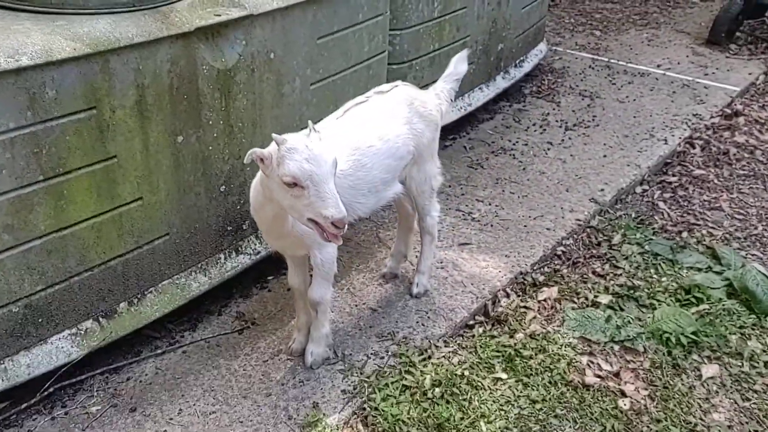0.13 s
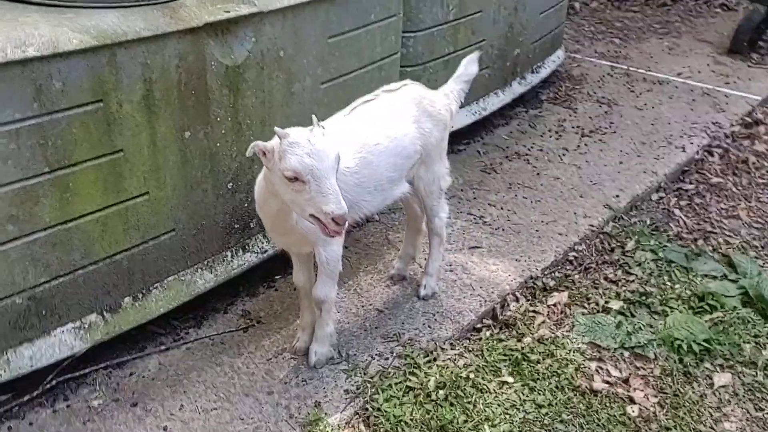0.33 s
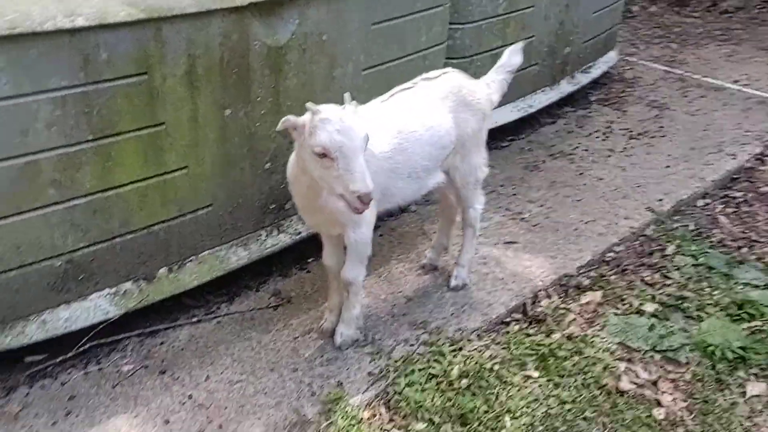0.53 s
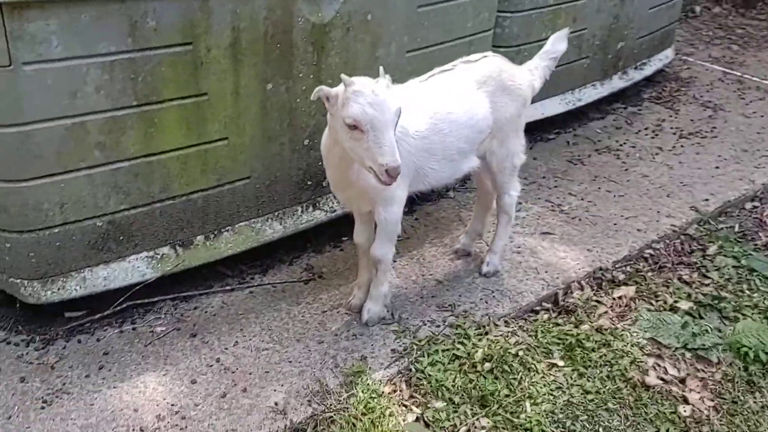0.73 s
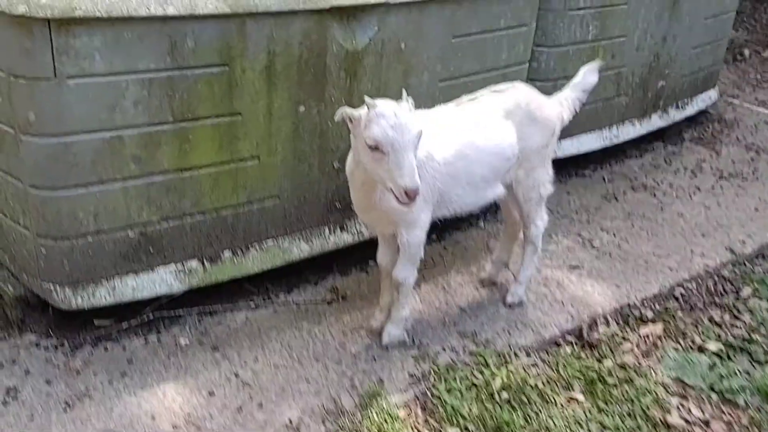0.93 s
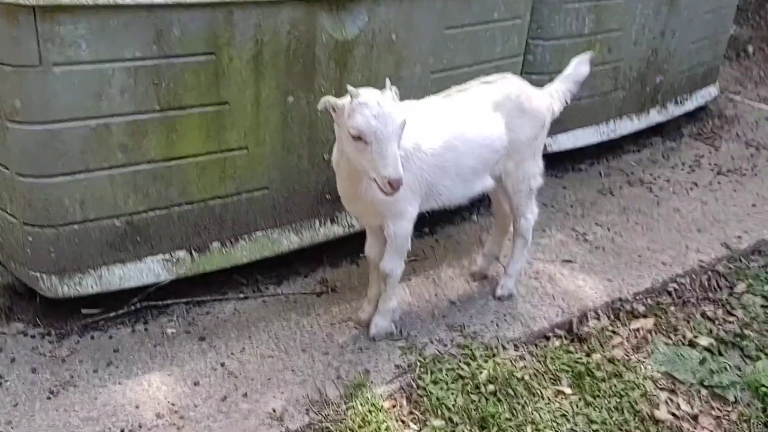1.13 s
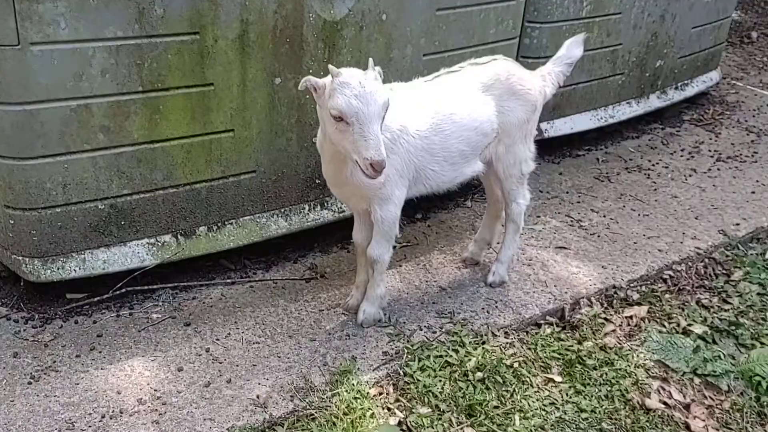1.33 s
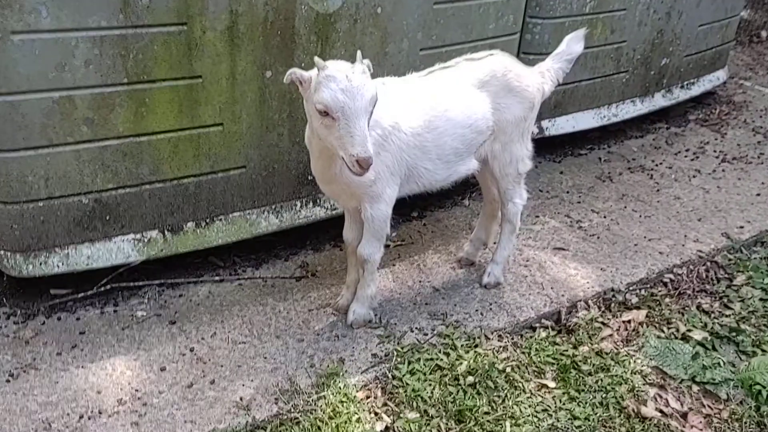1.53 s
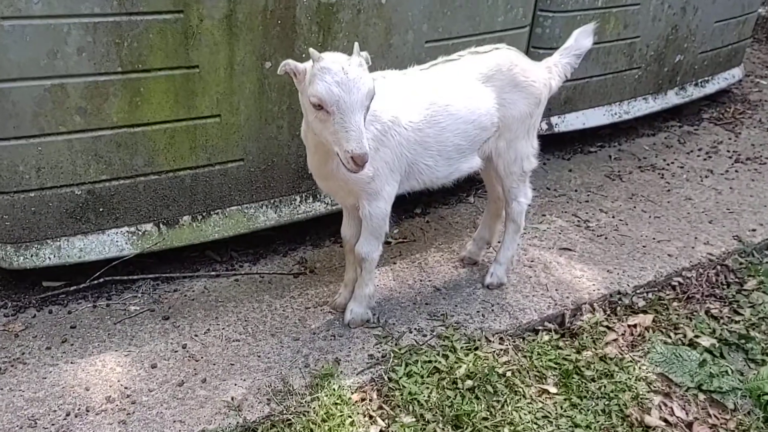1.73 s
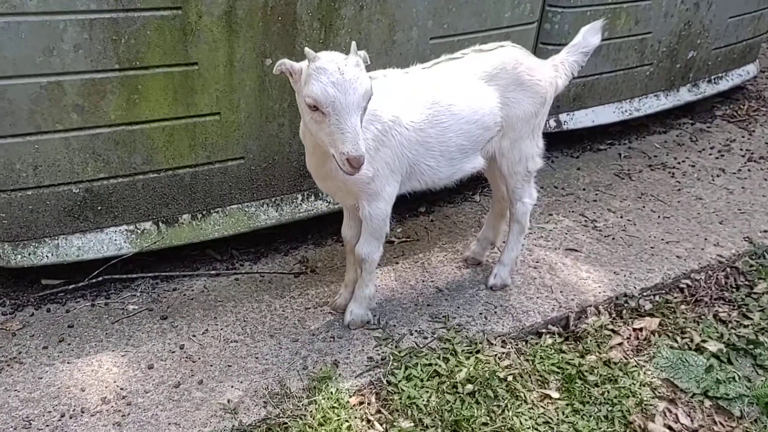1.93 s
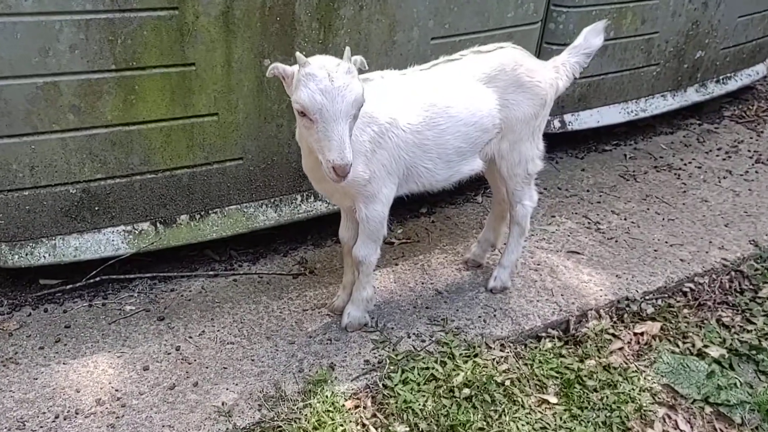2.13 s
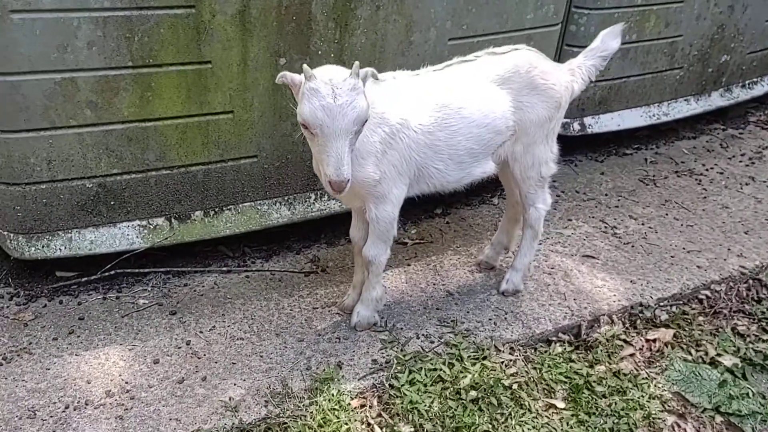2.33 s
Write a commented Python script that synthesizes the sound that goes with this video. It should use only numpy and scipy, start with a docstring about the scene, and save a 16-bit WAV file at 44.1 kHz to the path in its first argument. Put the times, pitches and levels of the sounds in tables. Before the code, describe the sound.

A young goat gives one high, trembling bleat outdoors, then a finger thumps the microphone.

```python
"""A goat kid gives one high, wavering bleat that sags and turns hoarse as its mouth closes: summed overtones
and pulsed breath, shaped by moving mouth resonances and answered by a near wall and the yard.
From within the bleat on, a finger bumps and brushes the right microphone port: ringing thuds and shaped noise.
After the bleat two distant songbirds whistle gliding sine tones among the trees, while a rustle dies away.
Grip rumble and a quiet outdoor hiss of coloured noise lie under it all."""
import sys
import numpy as np
from scipy import signal
from scipy.fft import rfft, irfft, next_fast_len
from scipy.io import wavfile
from scipy.ndimage import map_coordinates

SR = 44100
rng = np.random.default_rng(int(sys.argv[2]) if len(sys.argv) > 2 else 0)


def put_to_file(sound):
    """Save the sound as 16-bit audio at rate SR, in the file named by the first command-line argument."""
    columns = np.atleast_2d(sound).T  # one column per channel
    safe = np.clip(columns, -1, 1)
    whole_steps = np.round(safe * 32767)
    wavfile.write(sys.argv[1], SR, whole_steps.astype(np.int16))


N = 109853  # length in samples


def amp(db):
    """Decibels to gain."""
    return 10 ** (np.asarray(db) / 20)


def unit(x):
    """Scaled to rms 1."""
    return x / np.sqrt(np.mean(x ** 2) + 1e-20)


def along(points, hz):
    """(Hz, value) points read on a log frequency axis."""
    f, v = np.transpose(points)
    return np.interp(np.log(hz + 1), np.log(f + 1), v)


def curves(rows, t):
    """Each column after the first, read at the times t."""
    start, *columns = np.transpose(rows)
    return [np.interp(t, start, column) for column in columns]


def wobble(rate, t):
    """A smooth random curve, rate knots a second."""
    knots = rng.standard_normal(int(t[-1] * rate) + 4)
    return map_coordinates(knots, [t * rate])


def filtered(x, response):
    """x shaped by a gain that depends on frequency."""
    size = next_fast_len(N + SR // 2)
    return irfft(rfft(x, size) * response(np.fft.rfftfreq(size, 1 / SR)), size)[..., :N]


def noise(spectrum):
    """Coloured noise of rms 1."""
    return unit(filtered(rng.standard_normal(N), lambda hz: amp(along(spectrum, hz))))


def panned(x, balance):
    """Left and right leaning apart by frequency."""
    return filtered(x, lambda hz: amp(np.outer([.5, -.5], along(balance, hz))))


def resonance(spectrum, hz, size=4096):
    """Complex log gain of a causal (minimum-phase) resonator, read at hz."""
    grid = np.fft.rfftfreq(size, 1 / SR)
    cepstrum = irfft(np.log(amp(along(spectrum, grid))))
    # fold the cepstrum so that the phase follows from the gain
    cepstrum[1:size // 2] *= 2
    cepstrum[size // 2 + 1:] = 0
    return np.interp(hz, grid, rfft(cepstrum))


def echoes(x, decay):
    """A diffuse stereo tail in which each frequency dies at its own speed."""
    hz, t, z = signal.stft(rng.standard_normal((2, SR + SR // 2)), SR, nperseg=256)
    fade = amp(-60 * t / along(decay, hz)[:, None]) * (t > 0)
    tail = signal.istft(z * fade, SR, nperseg=256)[1]
    return signal.fftconvolve(np.atleast_2d(x), tail / np.linalg.norm(tail[0]), axes=1)[:, :N]


# one cycle of the tremble, a quick letting go and a slow build-up: cycle_share, effort (-1..1)
TREMBLE_CYCLE = [(0, 1), (.2, -0.92), (.7, 0.4), (1, 0.85)]
# how much of the tremble is left: start_s, depth_share
TREMBLE_DEPTH = [(.2, 1), (.25, 0.1)]
TREMBLE_PER_S, TREMBLE_START_S = 10.65, 0.0019


def tremble(t):
    """The throat's effort lets go quickly and builds up slowly, over and over."""
    cycle = (t - TREMBLE_START_S) * TREMBLE_PER_S % 1
    return curves(TREMBLE_CYCLE, cycle)[0] * curves(TREMBLE_DEPTH, t)[0]


# closing of the mouth: start_s, closing (0 open, 1 half, 2 shut)
MOUTH_CLOSING = [(.25, 0.2), (.268, 1.2), (.336, 1), (.352, 1.6)]


def mouth_shares(t):
    """The closing mouth crossfades between neighbouring shapes: open, half closed, nearly shut."""
    closing, = curves(MOUTH_CLOSING, t)
    return [np.clip(1 - abs(closing - i), 0, 1) for i in range(3)]


# resonances of throat and mouth, wide open, half closed and nearly shut: frequency_hz, gain_db
MOUTHS = [[(440, -27.5), (870, -12.5), (1310, 2.5), (1750, -15), (2180, -24.5), (2620, -1), (3500, -12.5),
           (3930, -12), (4370, -1.5), (5240, -12), (5680, -23), (6120, -17), (7860, -30.5), (10050, -39),
           (14420, -62.5)], [(410, -21.5), (820, -9.5), (1230, 2.5), (1640, -10), (2050, -9),
                               (2460, -12.5), (2870, -5.5), (3300, -11), (4100, -2.5), (4930, -4),
                               (6160, -20), (9850, -36), (14370, -58)], [(400, -14.5), (680, -28), (1200, -10), (1600, -18),
                                                   (2000, -3), (2400, -12), (2800, 0.5), (3300, -5),
                                                   (4000, -1.5), (4790, -2.5), (6390, -16), (9990, -37),
                                                   (14380, -56)]]
# pursing lips pull the low resonances down: start_s, shift_share (at 1600 Hz)
LIP_PURSING = [(.376, 0.014), (.405, 0.44)]
PHASE_SCATTER = .5  # radians, between the overtones
GRAIN_DB = 4  # random flicker of the top overtones
RASP_HZ, RASP_DB = 5500, 3.5  # overtones above this flare whenever the effort lets go


def mouth_gain(hz, t, effort):
    """Complex gain the mouth gives each overtone, grainy and raspy at the top."""
    purse = curves(LIP_PURSING, t)[0] * np.exp(-2 * np.log(hz / 1600) ** 2)
    # reading the response higher up moves its peaks down
    pursed_hz = hz * (1 + purse)
    log_gain = sum(w * resonance(m, pursed_hz) for w, m in zip(mouth_shares(t), MOUTHS))
    scatter = PHASE_SCATTER * rng.standard_normal((len(hz), 1))
    top_db = (GRAIN_DB * wobble(200, t) - RASP_DB * effort) * (hz > RASP_HZ)
    return np.exp(log_gain + 1j * scatter) * amp(top_db)


# tilt of the breath over the mouth's own colour: frequency_hz, gain_db
BREATH_TILT = [(2500, -13.5), (4500, -5.5), (7000, 10.5)]


def breath_noise(t, phase):
    """Turbulent air through the moving mouth, pulsed once per cycle of the voice."""
    hiss = [unit(filtered(noise(m), lambda f: amp(along(BREATH_TILT, f))))[:len(t)] for m in MOUTHS]
    moving = sum(w * h for w, h in zip(mouth_shares(t), hiss))
    return moving * (1 + .6 * np.cos(phase))


def levelled(gain, db):
    """Overtone gains scaled to a common rms level at each moment."""
    return gain * amp(db) / np.sqrt(np.sum(abs(gain) ** 2, axis=0) / 2)


# the bleat around which the tremble swings: start_s, pitch_hz, low_db (below TREBLE_HZ), treble_db
BLEAT = [(0, 438.7, -17.5, -16), (.19, 435.5, -18.5, -15.5), (.225, 431.5, -21, -20),
         (.25, 428.8, -18.5, -23), (.266, 411.5, -21, -22.5), (.294, 405.4, -24.5, -18),
         (.308, 416.3, -28, -23.5), (.336, 413.6, -29, -25.5), (.353, 403, -34.5, -21.5),
         (.378, 396.5, -36.5, -23.5), (.406, 353.6, -33.5, -33), (.428, 324.4, -45, -47.5)]
# hoarseness: start_s, jitter_share (of pitch), breath_db (against the voice)
HOARSENESS = [(.09, .003, -42), (.11, .006, -29), (.13, .003, -42), (.19, .003, -40), (.21, .006, -26),
              (.258, .012, -21), (.275, .003, -33), (.385, .004, -27), (.408, .02, -18), (.43, .08, -5)]
# stereo lean of the kid: frequency_hz, left_minus_right_db
GOAT_PAN = [(900, 2.5), (1300, -4), (2000, 7.5), (3000, -2.5), (5500, 0), (6500, 7.5), (9000, 3.5),
            (13000, 4)]
TREMBLE_PITCH, TREMBLE_LOW_DB, TREMBLE_HIGH_DB = 0.017, 2.5, 2.5  # swing of pitch (share) and levels
TREBLE_HZ, RELEASE_S = 2160, 0.016
FLUTTER_DB = 1.5  # at TREBLE_HZ, stronger above
LEFT_LEAD_S = .00007  # the voice reaches the left port first


def goat(count=36):
    """Trembling overtones and pulsed breath pass through a mouth that closes and purses."""
    end = BLEAT[-1][0]
    t = np.arange(int((end + 2 * RELEASE_S) * SR)) / SR
    effort = tremble(t)
    pitch, low_db, treble_db = curves(BLEAT, t)
    pitch = pitch * (1 + TREMBLE_PITCH * effort)
    low_db = low_db + TREMBLE_LOW_DB * effort
    treble_db = treble_db + TREMBLE_HIGH_DB * effort
    jitter, breath_db = curves(HOARSENESS, t)

    k = np.arange(1, count + 1)[:, None]
    hz = k * pitch
    phase = 2 * np.pi * np.cumsum(pitch * (1 + jitter * wobble(500, t))) / SR
    gain = mouth_gain(hz, t, effort)
    high = 1 / (1 + (TREBLE_HZ / hz) ** 20)  # steep crossover from low to treble
    ports = []
    for lead in (LEFT_LEAD_S, 0):
        # the real part moves the level, the imaginary part the phase
        flutter = np.array([wobble(30.33, t) + 1j * wobble(29.44, t) for _ in k])
        fluttered = gain * amp(FLUTTER_DB * np.sqrt(hz / TREBLE_HZ) * flutter)
        overtones = levelled(fluttered * (1 - high), low_db) + levelled(fluttered * high, treble_db)
        voice = np.sum(overtones * np.exp(1j * (k * phase + 2 * np.pi * hz * lead)), axis=0).real
        breath = breath_noise(t, phase) * np.hypot(amp(low_db), amp(treble_db))
        ports.append((voice + amp(breath_db) * breath) / np.hypot(1, amp(breath_db)))
    release = np.clip(1 - (t - end) / RELEASE_S, 0, 1)
    return panned(np.array(ports) * release, GOAT_PAN)


# colour of the snag and the scrapes: frequency_hz, gain_db
SCRAPE_TONE = [(300, -6), (1500, -2.5), (3200, -6), (5500, -12), (8000, -20), (16000, -40)]
SNAG_AT_S, SNAG_DB, SNAG_WIDTH_S = .5349, -17.5, 0.0009
SQUEAK_HZ, SQUEAK_RISE_S, SQUEAK_DB = 2310, .0012, -11  # pitch at the snag, e times higher per rise


def snag(t):
    """The fingertip snags the port with a crack of noise and slips with a tiny rising squeak."""
    crack = amp(SNAG_DB) * noise(SCRAPE_TONE) * np.exp(-((t - SNAG_AT_S) / SNAG_WIDTH_S) ** 2 / 2)
    slip = np.clip((t - SNAG_AT_S) / SQUEAK_RISE_S, -10, 2)
    squeak = np.sin(2 * np.pi * SQUEAK_HZ * SQUEAK_RISE_S * np.exp(slip))
    return crack + amp(SQUEAK_DB) * squeak * np.exp(-2 * slip ** 2) * (slip < 2)


# finger bumps: start_s, thud_db, thud_hz, thud_t60_s, scrape_db
FINGER_BUMPS = [(0.133, -27, 200, 0.012, -74), (0.4761, -9, 228, 0.016, -39.5),
                (0.535, -1.5, 178.6, 0.018, -17.5), (0.863, -51, 252, 0.016, -38)]
CASE_HZ, CASE_DB, CASE_T60_S = 101, -21, 0.047  # low ring of the camera body, against the thud
PORT_HZ, PORT_DB = 351, -4  # ring of the covered port, against the thud
THUD_ATTACK_S, SCRAPE_T60_S = .001, .022


def bumps(t):
    """Each bump is a dull thud with the rings of port and case, and a short scrape."""
    hits = np.zeros(N)
    for start, thud_db, hz, t60, scrape_db in FINGER_BUMPS:
        u = np.maximum(t - start, 0)
        attack = 1 - np.exp(-(u / THUD_ATTACK_S) ** 2)
        fade = lambda life: np.exp(-np.log(1000) * u / life) * attack
        thud = np.sin(2 * np.pi * hz * u) + amp(PORT_DB) * np.sin(2 * np.pi * PORT_HZ * u)
        case = amp(CASE_DB) * np.sin(2 * np.pi * CASE_HZ * u)
        hits += amp(thud_db) * (thud * fade(t60) + case * fade(CASE_T60_S))
        hits += amp(scrape_db) * noise(SCRAPE_TONE) * fade(SCRAPE_T60_S)
    return hits


# the sliding finger: start_s, level_db
BRUSH = [(.78, -67), (.84, -56), (.865, -42.5), (.93, -40.5), (.97, -55.5), (1.05, -75)]
# its colour: frequency_hz, gain_db
BRUSH_TONE = [(30, -26), (90, -0.5), (206, -1.5), (650, -13.5), (1190, -9), (2200, -23.5), (12000, -52.5)]
# handling rumble: start_s, level_db
GRIP = [(0, -66), (.2, -58), (.38, -53), (.55, -56.5), (.7, -68), (1.1, -64.5), (1.3, -72.5)]
# its colour: frequency_hz, gain_db
GRIP_TONE = [(25, -28.5), (60, -7), (110, -1.5), (500, -14), (4000, -69.5)]
LOW_CUT_HZ = 85  # for bumps and snag only
LEAK_DB = -25  # of the finger's noise into the left port


def finger():
    """Dull bumps, one squeaky snag and a short slide on the right port, over the rumble of the grip."""
    t = np.arange(N) / SR
    low_cut = signal.butter(4, LOW_CUT_HZ, "high", fs=SR, output="sos")
    port = signal.sosfilt(low_cut, snag(t) + bumps(t))
    for levels, tone in ((BRUSH, BRUSH_TONE), (GRIP, GRIP_TONE)):
        level_db = curves(levels, t)[0] + 1.2 * wobble(60, t)
        port += amp(level_db) * noise(tone)
    return np.array([amp(LEAK_DB) * port, port])


# arched whistles of the first bird: top_s, level_db
ARCHES = [(.648, -56), (1.008, -57), (1.348, -60.5), (1.668, -61)]
# shape of one arch: from_top_s, pitch_hz, level_db
ARCH_SHAPE = [(-.09, 1628, -18.5), (-.075, 1720, -2), (-.02, 2233, -2.5), (0, 2811, -4.5),
              (.016, 2200, -1.5), (.05, 1950, -6), (.105, 1602, -9.5), (0.149, 1533, -11)]
# rising chirps of the second bird: start_s, level_db
CHIRPS = [(.87, -63), (1.11, -63), (1.36, -63.5), (1.605, -65), (1.86, -65.5), (2.105, -65.5),
          (2.36, -67.5)]
# shape of one chirp, a quick rise, a gap, a soft low slur: from_start_s, pitch_hz, level_db
CHIRP_SHAPE = [(0, 2450, -2), (.02, 2800, 2), (.04, 3500, -2.5), (.075, 3580, -5.5), (.085, 2986, -50),
               (.097, 2080, -32), (0.111, 2014, -5), (.15, 1780, -21)]
# echo among the trees: frequency_hz, t60_s
TREES = [(3000, 0.35), (9000, 0.133)]
ARCH_WET_DB, CHIRP_WET_DB = -3, 5  # echo against the direct whistle
PITCH_DRIFT, PITCH_SHIVER = .012, 0.0041  # slow and fast, shares of the pitch
WHISTLE_FLICKER_DB = 2.5


def bird(calls, shape, wet_db):
    """One whistled figure, a gliding sine, repeated with an echo among the trees."""
    t = np.arange(N) / SR
    song = np.zeros(N)
    for start, call_db in calls:
        u = t - start
        hz, shape_db = curves(shape, u)
        waver = 1 + PITCH_DRIFT * wobble(8.8, t) + PITCH_SHIVER * wobble(120, t)
        phase = 2 * np.pi * np.cumsum(hz * waver) / SR
        level_db = call_db + shape_db + WHISTLE_FLICKER_DB * wobble(60, t)
        sounding = (u > shape[0][0]) & (u < shape[-1][0])
        song += amp(level_db) * np.sin(phase) * sounding
    return (song + amp(wet_db) * echoes(song, TREES)) / np.hypot(1, amp(wet_db))


# the near wall's answer: frequency_hz, t60_s
NEAR_WALLS = [(2000, 0.36), (12000, 0.32)]
# the far yard's answer: frequency_hz, t60_s
FAR_YARD = [(200, 1.1), (5000, 2)]
# colour of the far answer: frequency_hz, gain_db
FAR_TONE = [(400, 8), (1300, -3.5), (2000, 3.5), (5000, -0.5)]
NEAR_DB, FAR_DB = -22, -35  # against the kid, the far one before its colour


def yard(kid):
    """The bleat comes back as a short tail from a near wall and a longer one from the yard."""
    far = filtered(echoes(kid, FAR_YARD), lambda hz: amp(along(FAR_TONE, hz)))
    return amp(NEAR_DB) * echoes(kid, NEAR_WALLS) + amp(FAR_DB) * far


# soft rustle: start_s, level_db
RUSTLE = [(.6, -63.5), (1.1, -66), (1.6, -79)]
# its colour: frequency_hz, gain_db
RUSTLE_TONE = [(100, -9), (400, -4), (1500, -0.5), (5000, -9), (12000, -27.5)]


def rustle():
    """Soft noise, independent in both ports, that dies away after the bleat."""
    level_db, = curves(RUSTLE, np.arange(N) / SR)
    return amp(level_db) * np.array([noise(RUSTLE_TONE), noise(RUSTLE_TONE)])


# colour of the background hiss: frequency_hz, gain_db
AIR_TONE = [(15, -56.5), (25, -26.5), (79, -8), (113, 1.5), (173, -9), (233, -1), (289, -24.5), (421, -9),
            (495, -19), (826, -15.5), (1240, -21), (2230, -18), (3500, -16.5), (4200, -8), (4950, -7.5),
            (6380, -22), (9550, -9.5), (11200, -27.5), (15500, -31)]
# its stereo lean: frequency_hz, left_minus_right_db
AIR_PAN = [(60, -7.5), (250, 5.5), (6500, 5), (9500, -2.5), (13000, 3.5)]
AIR_DB, AIR_ALIKE = -64, 0.066  # level; share of power common to both ports


def air():
    """Faint steady outdoor hiss, partly alike in both ports."""
    common = np.sqrt(AIR_ALIKE) * noise(AIR_TONE)
    separate = np.sqrt(1 - AIR_ALIKE) * np.array([noise(AIR_TONE), noise(AIR_TONE)])
    return amp(AIR_DB) * panned(common + separate, AIR_PAN)


def scene():
    """The kid near a wall, the hand on the camera, the birds, and the yard behind."""
    kid = goat()
    birds = bird(ARCHES, ARCH_SHAPE, ARCH_WET_DB) + bird(CHIRPS, CHIRP_SHAPE, CHIRP_WET_DB)
    return kid + finger() + birds + yard(kid) + rustle() + air()


TOP_HZ = 15700


def record(dry):
    """The camera keeps nothing above its band limit."""
    return filtered(dry, lambda hz: hz < TOP_HZ)


dry = scene()
out = record(dry)
put_to_file(out)
```